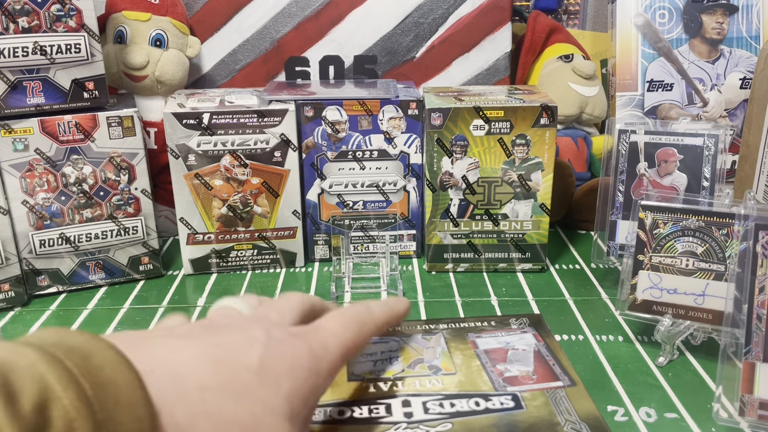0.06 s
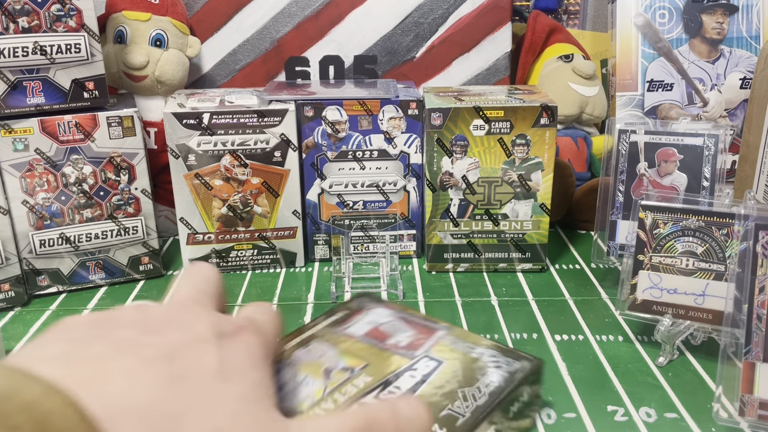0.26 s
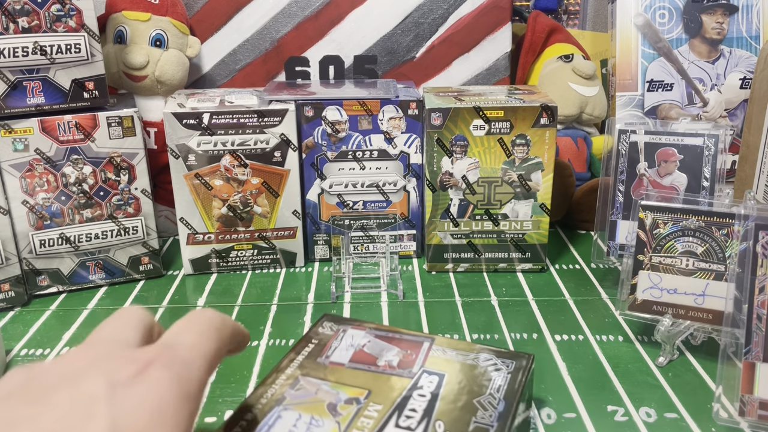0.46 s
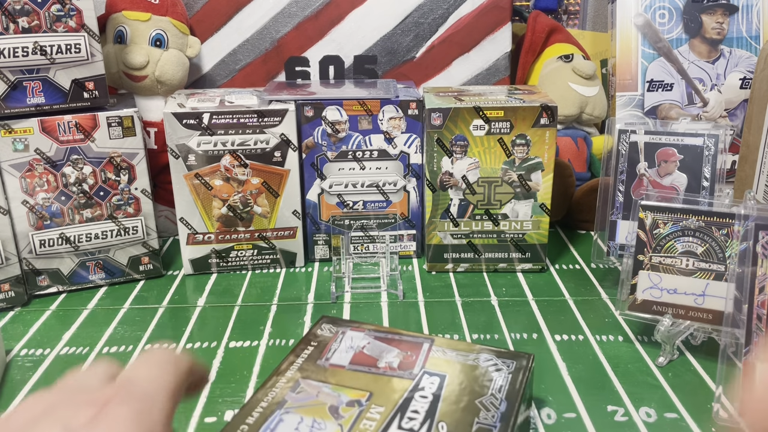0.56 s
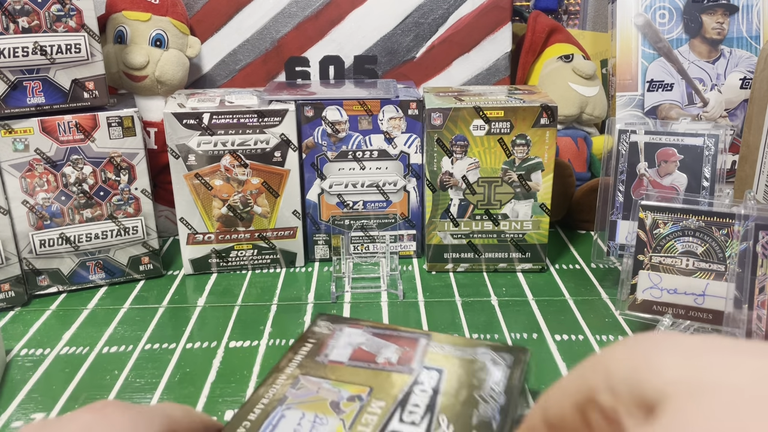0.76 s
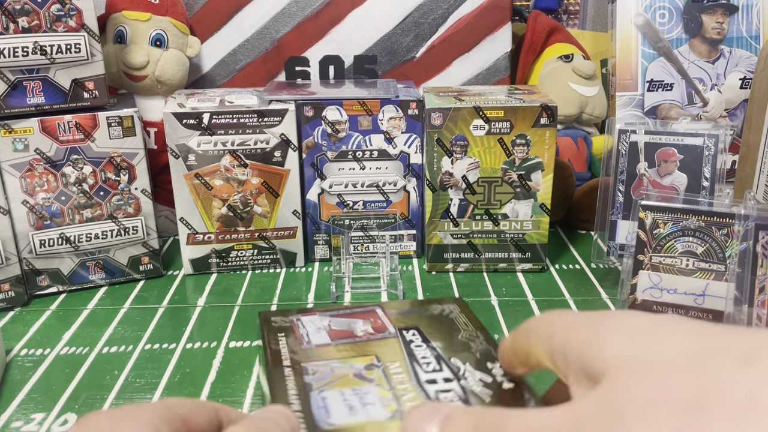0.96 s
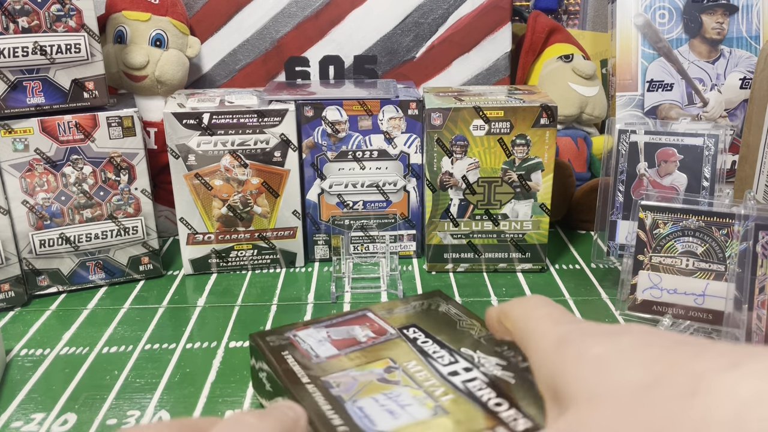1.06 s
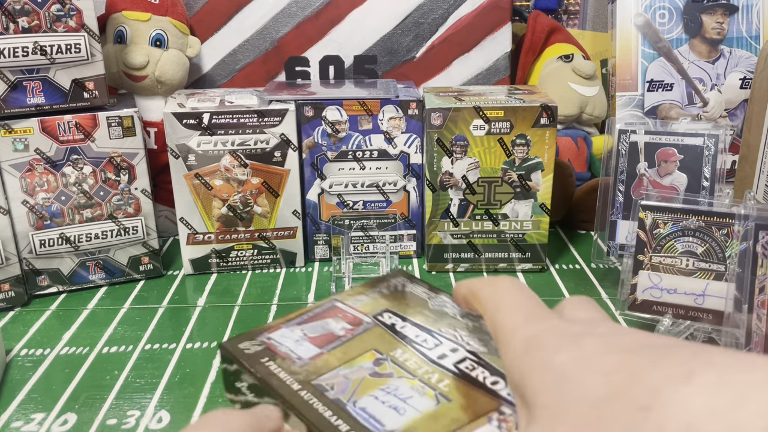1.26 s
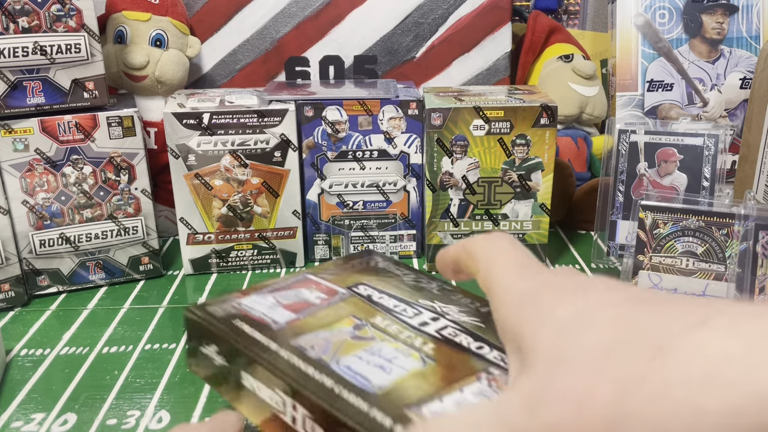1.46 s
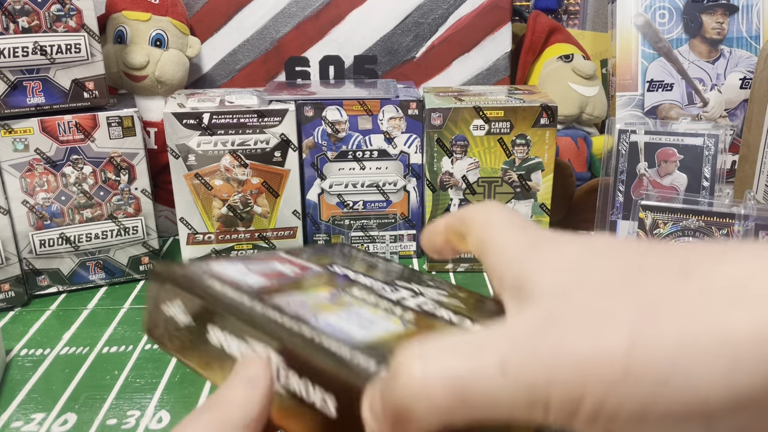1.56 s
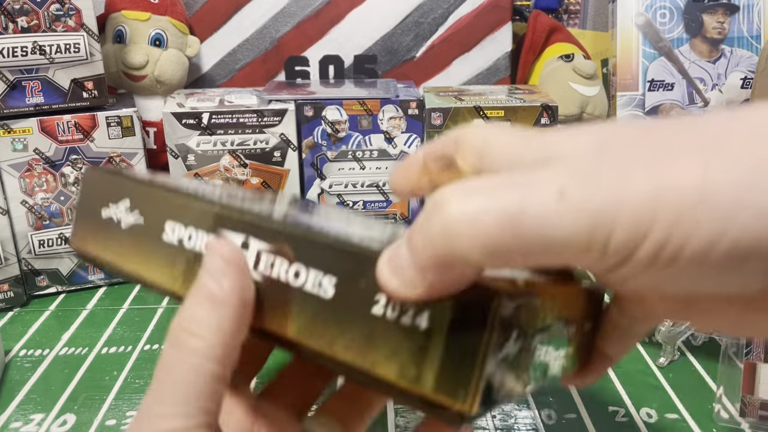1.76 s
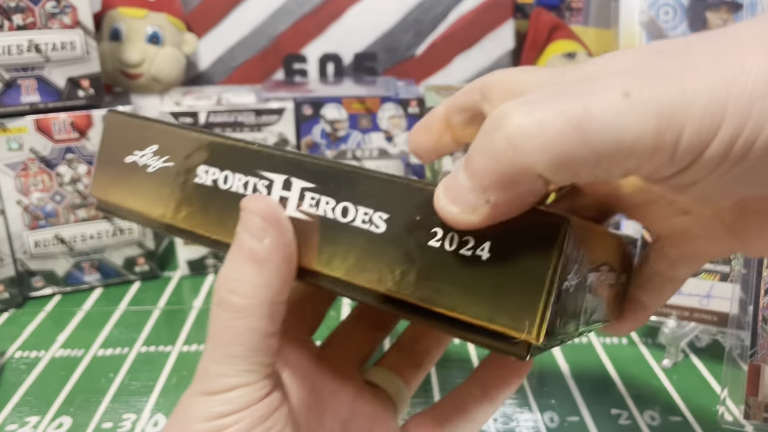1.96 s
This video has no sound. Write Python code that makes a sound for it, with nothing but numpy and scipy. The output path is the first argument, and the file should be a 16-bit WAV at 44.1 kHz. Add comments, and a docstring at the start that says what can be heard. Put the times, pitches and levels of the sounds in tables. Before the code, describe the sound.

Close up in a small, quiet room, a cardboard box is pushed twice over a cloth-covered table, with dry scrapes, light hollow knocks and ticking plastic wrap. After a lull, hands lift it with faint rustling and dull bumps.

```python
"""A film-wrapped cardboard box is pushed across a cloth-covered table, slid again, tipped and lifted.
Tiny slips and a few knocks make the hollow box ring, and the table top drums along.
The wrapping crackles and hisses under the fingers, and the hands bump the box softly.
The microphone is close, in a small, quiet room."""
import sys
import numpy as np
from scipy import signal
from scipy.fft import rfft, irfft, next_fast_len
from scipy.io import wavfile
from scipy.ndimage import map_coordinates

SR = 44100
rng = np.random.default_rng(int(sys.argv[2]) if len(sys.argv) > 2 else 0)


def to_wav(s):
    """Save 16-bit WAV."""
    ch = np.atleast_2d(s).T  # columns
    pcm = np.round(np.clip(ch, -1, 1) * 32767)  # PCM
    wavfile.write(sys.argv[1], SR, pcm.astype(np.int16))


N = 88200  # two seconds


def amp(db):
    """Turn decibels into a gain."""
    return 10 ** (np.asarray(db) / 20)


def unit(x):
    """Scale a sound to an average (rms) level of 1."""
    return x / np.sqrt(np.mean(x ** 2) + 1e-20)


def along(points, hz):
    """Read between (Hz, value) points, giving each octave equal room."""
    freqs, values = np.transpose(points)
    return np.interp(np.log(hz + 1), np.log(freqs + 1), values)


def curve(rows):
    """Join (seconds, value) points with straight lines."""
    return np.interp(np.arange(N) / SR, *np.transpose(rows))


def wobble(rate):
    """A smooth curve through `rate` random values a second."""
    return map_coordinates(rng.standard_normal(int(N * rate / SR) + 4), [np.arange(N) * rate / SR])


def filtered(x, response):
    """Multiply each frequency in a sound by response(hz)."""
    n = x.shape[-1]
    padded = next_fast_len(n + 8192)
    return irfft(rfft(x, padded) * response(np.fft.rfftfreq(padded, 1 / SR)), padded)[..., :n]


def noise(colour, shape):
    """Noise with a colour: a list of how strong each frequency is."""
    return unit(filtered(rng.standard_normal(shape), lambda hz: amp(along(colour, hz))))


def add(track, s, sound):
    """Mix a sound into the track, starting at s seconds."""
    part = track[max(round(s * SR), 0):][:len(sound)]
    part += sound[:len(part)]


def swell(s, db, width):
    """A bell-shaped rise and fall around s seconds."""
    return amp(db) * np.exp(-.5 * ((np.arange(N) / SR - s) / width) ** 2)


def grains(rate, spread_db, colour):
    """Tiny uneven hits, about `rate` a second, each ringing with the given colour."""
    hits = (rng.random(N) < rate / SR) * rng.choice([-1, 1], N)
    strengths = amp(spread_db * np.clip(rng.standard_normal(N), -2, 2))
    # Turn the colour into a ring that starts at once and then dies away.
    size = 4096
    cepstrum = irfft(np.log(amp(along(colour, np.fft.rfftfreq(size, 1 / SR)))))
    ring = irfft(np.exp(rfft(2 * cepstrum * (np.arange(size) < size // 2))))
    return unit(signal.fftconvolve(hits * strengths, ring)[:N])


# How hard the box slides. Each row: time in seconds, level in dB.
SLIDE_FORCE = [(0, -53.5), (.08, -60.5), (.10, -48.5), (.135, -38), (.17, -39.5), (.21, -45), (.26, -36.5),
               (.31, -40), (.355, -44), (.40, -49.5), (.45, -65), (.50, -53.5), (.56, -75), (.69, -61.5),
               (.75, -51.5), (.81, -41), (.89, -44), (.94, -50), (1.04, -53.5), (1.11, -63.5),
               (1.15, -55.5), (1.21, -73), (1.43, -78.5), (1.55, -72), (1.70, -59.5), (1.83, -65),
               (1.89, -68), (1.97, -64), (2, -46.5)]
# The tone of the box and table while sliding. Each row: frequency in Hz, relative level in dB.
SLIP_COLOUR = [(60, -27), (170, -6), (240, -7), (340, 3), (470, 0.5), (590, -12), (720, -10), (920, -10.5),
               (1250, -16), (1700, -21.5), (2500, -26.5), (7000, -40.5), (14000, -55)]
# The tone of a dry scrape. Each row: frequency in Hz, relative level in dB.
SCRAPE_COLOUR = [(100, -13), (400, -12), (1100, 0), (2000, -9), (3500, -7.5), (7000, -23.5), (14000, -39.5)]
def slide():
    """Tiny uneven slips ring the box, scrape on the cloth and set the table top drumming."""
    table_hz, table_fade_s = 131.3, 0.27
    force, t = amp(curve(SLIDE_FORCE)), np.arange(N) / SR
    slips = grains(rate=1300, spread_db=4.5, colour=SLIP_COLOUR) * amp(0.96 * wobble(70))
    scrape = amp(-21.5) * grains(rate=760, spread_db=8, colour=SCRAPE_COLOUR)
    drum = unit(np.sin(2 * np.pi * table_hz * t + 1.3 * wobble(20)) * amp(1.9 * wobble(24.6)))
    fade = amp(-60 * t / table_fade_s)
    lingering_force = signal.fftconvolve(force, fade / fade.sum())[:N]
    return force * (slips + scrape) + amp(-8.5) * drum * lingering_force


# How loud the rubbing is. Each row: time in seconds, relative level in dB.
HISS_LEVEL = [(0, -73.5), (.08, -77), (.13, -65.5), (.27, -61), (.34, -70), (.45, -69.5), (.51, -69.5),
              (.56, -72), (.62, -79.5), (.69, -81), (.76, -69), (1.05, -71), (1.15, -72.5), (1.28, -90.5),
              (1.44, -90.5), (1.49, -87), (1.58, -86.5), (1.65, -68.5), (1.88, -70), (2, -68.5)]
# The tone of the rubbing. Each row: frequency in Hz, relative level in dB.
HISS_COLOUR = [(800, -27.5), (1600, 0), (4600, -6.5), (7000, -5.5), (8200, -3), (9500, -9), (13600, -13),
               (14500, -34)]
def rub():
    """Skin and cloth brush the wrapping with a fine, grainy hiss."""
    hiss = unit(noise(HISS_COLOUR, N) * amp(1.5 * wobble(200)))
    return amp(curve(HISS_LEVEL) + 6.5) * hiss


# The tone of the quiet room. Each row: frequency in Hz, relative level in dB.
RUMBLE_COLOUR = [(20, -17), (38, -0.5), (54, 9), (80, 6.5), (125, -21.5), (180, -6), (350, -22.5),
                 (600, -55), (1500, -36.5), (5000, -51), (14000, -43.5)]
def room_tone():
    """A low rumble, nearly alike on both sides, with a wavering hum in it."""
    hum_hz, t = 54.4, np.arange(N) / SR
    hum = np.sin(2 * np.pi * hum_hz * t + 0.64 * wobble(7)) * amp(1.6 * wobble(8.94))
    rumble = noise(RUMBLE_COLOUR, N) + amp(-9) * noise(RUMBLE_COLOUR, (2, N))
    return amp(-65.5) * rumble + amp(-63) * unit(hum)


# Soft bumps. Each row: peak time in seconds, level in dB, pitch in Hz, rise and fall time in seconds.
HAND_BUMPS = [(0.026, -31, 74, 0.0049), (0.06, -28, 83.5, 0.0045), (0.144, -40.5, 67, 0.016),
              (.245, -32, 103, 0.0079), (0.309, -47, 49.4, 0.022), (0.669, -49, 58.6, 0.0077),
              (0.769, -41, 63, 0.012), (0.807, -43, 45, 0.019), (1.618, -49.5, 52, 0.02),
              (1.78, -43.5, 69, 0.022), (1.799, -31, 111, 0.0046), (1.843, -40, 60, 0.013),
              (1.936, -41.5, 44.6, 0.0083), (1.969, -41, 73.7, 0.0085), (1.997, -26, 99.5, 0.0056)]
def thumps():
    """A hand pushes the box or table through a cycle or two of low shaking."""
    out, t = np.zeros(N), np.arange(N) / SR
    for s, db, hz, width in HAND_BUMPS:
        rounded_peak = np.exp(.5 - np.hypot((t - s) / width, .5))
        out += amp(db) * rounded_peak * np.cos(2 * np.pi * hz * (t - s))
    return out


# The wrapping snaps. Each row: start in seconds, relative level in dB, boost or cut below 8000 Hz in dB.
FILM_SNAPS = [(.089, -39.5, 8), (0.094, -47, -3), (0.0962, -45, -13), (0.116, -30, 2.5), (0.139, -43, -1),
              (0.15, -41, -4), (0.1563, -36, -5), (0.1607, -56, -4), (0.1975, -39.5, -5), (0.2258, -32, 2),
              (0.25, -37.5, 3), (.2870, -21.5, -0.5), (0.2958, -33.5, 8), (0.3708, -34, 10),
              (0.3743, -40, 7), (0.4019, -33.5, 2), (.4125, -56, 4), (0.4623, -38.5, -2), (.476, -38, 1),
              (0.489, -37, 4), (0.501, -33, 5), (0.5071, -31, -4), (.515, -47, -6), (0.522, -45, 10),
              (0.7068, -47.5, 12), (0.7272, -47.5, 9), (0.7433, -40.5, 9), (0.767, -31.5, -4),
              (.795, -40, 14), (.859, -47, 12), (1.482, -57.5, 14), (1.609, -51.5, 12), (1.626, -51, 7)]
# The tone of a snap. Each row: frequency in Hz, relative level in dB.
SNAP_COLOUR = [(1000, -34), (3000, -14), (4200, -18), (5600, -11), (7000, -10.5), (9000, -9.5),
               (10500, -3.5), (12000, -12.5), (14000, -17.5), (16000, -33)]
def snaps():
    """The tight film buckles in bright ticks, each with a faint flutter after it."""
    rise_s, tick_fade_s, flutter_fade_s = 0.00078, 0.0059, 0.039
    out, t = np.zeros(N), np.arange(SR // 20) / SR
    rise = 1 - np.exp(-t / rise_s)
    shape = rise * (amp(-60 * t / tick_fade_s) + amp(-16 - 60 * t / flutter_fade_s))
    for s, db, low_db in FILM_SNAPS:
        colour = [(hz, level + low_db * (hz < 8000)) for hz, level in SNAP_COLOUR]
        add(out, s, amp(db - 8) * shape / shape.max() * noise(colour, len(t)))
    return out


# Changes of hold. Each row: peak time in seconds, level in dB, width of the swell in seconds.
GRIP_SHIFTS = [(0.097, -44, 0.0071), (0.508, -50.5, 0.026), (0.677, -62.5, 0.084), (1.11, -59, 0.049),
               (1.284, -64, .02), (1.508, -65.5, 0.027), (1.62, -61.5, .03), (1.708, -59, 0.017),
               (1.794, -51, 0.0084), (1.836, -56, 0.024), (1.93, -57.5, 0.016)]
# The tone of their rustle. Each row: frequency in Hz, relative level in dB.
RUSTLE_COLOUR = [(60, -13.5), (125, -5), (180, -6.5), (290, -1), (380, -11), (550, -26), (1500, -35.5),
                 (6000, -65)]
def grips():
    """The fingers shift their hold with a dull rustle."""
    loudness = sum(swell(*row) for row in GRIP_SHIFTS)
    return loudness * grains(rate=600, spread_db=3.5, colour=RUSTLE_COLOUR)


# The notes the box rings with on the table, which each knock shifts up or down.
# Each row: base pitch in Hz, relative level in dB, seconds to fade by 60 dB.
BOX_NOTES = [(189.5, -19, 0.12), (292, -14.5, 0.045), (341, -2, 0.075), (429.9, 1.5, 0.058),
             (463.6, -9, 0.044), (527.5, -9.5, 0.049), (613, -16, 0.031), (707, -9, 0.037),
             (886, -9, 0.035), (1047, -8.5, 0.025), (1288, -17, .025), (1546, -21, 0.024)]
def box_ring(tilt_db, pitch, scatter_db):
    """One hit bends the cardboard in waves: the high ones arrive first, the low ones swell after."""
    rise_s, delay_s = 0.0034, .0012  # for a 400 Hz wave
    t, ring = np.arange(SR // 4) / SR, 0
    for hz, db, fade_s in BOX_NOTES:
        ratio = hz / 400
        age = np.maximum(t - delay_s / np.sqrt(ratio), 0)
        level = db + tilt_db * np.log2(max(ratio, 1)) + scatter_db * rng.normal()
        rise = 1 - np.exp(-age * ratio / rise_s)
        ring = ring + amp(level - 60 * age / fade_s) * rise * np.sin(2 * np.pi * hz * pitch * age)
    return ring / np.abs(ring).max()


# The knocks. Each row: start in seconds, level in dB, treble tilt in dB per octave, pitch multiplier.
EDGE_KNOCKS = [(0.1204, -35, 6, 0.89), (0.2273, -24.5, 2, 1.05), (0.3224, -30.5, -4.5, 1.03),
               (0.373, -26.5, 7, 0.98), (.426, -42, 1, 0.33), (.7945, -33, 9.5, 1.1), (.823, -31, 6, 1.16),
               (0.8333, -32.5, 7.5, 1.04), (.883, -35.5, 1, 1.01), (.975, -26, -1, 0.93),
               (0.9953, -20, -5, 1), (1.006, -31.5, 1, 1), (1.129, -47, -4, 1.12),
               (1.4843, -56.5, -2.5, 0.86), (1.7409, -34.5, -6.5, 1.11)]
def knocks():
    """An edge meets the table and rings the box, with a short dry crack."""
    crack_fade_s = 0.034
    out, t = np.zeros(N), np.arange(SR // 4) / SR
    for s, db, tilt_db, pitch in EDGE_KNOCKS:
        crack = amp(-23.5 + tilt_db - 60 * t / crack_fade_s) * noise(SCRAPE_COLOUR, len(t))
        add(out, s, amp(db) * (box_ring(tilt_db, pitch, scatter_db=5) + crack))
    return out


# Short skids. Each row: peak time in seconds, level in dB, width of the swell in seconds, pitch in Hz.
SKID_SWISHES = [(0.833, -43.5, 0.014, 1104), (1.239, -73.5, 0.011, 5720), (1.633, -58.5, 0.0094, 6400),
                (1.822, -61.5, 0.0044, 930), (1.94, -69, .06, 4440)]
def skids():
    """A fingertip or an edge of the box skids, making a swish of noise around one pitch."""
    out = np.zeros(N)
    for s, db, width, centre in SKID_SWISHES:
        swish = filtered(rng.standard_normal(N), lambda hz: 1 / (1 + (12 * (hz / centre - 1)) ** 2))
        out += swell(s, db, width) * unit(swish)
    return out


# The room's short echo. Each row: frequency in Hz, seconds to fade by 60 dB.
ECHO_FADE = [(150, 0.26), (1000, 0.11), (10000, 0.15)]
def placed(x, pan, phase, echo_db):
    """Add the room's echo to a sound; pan (dB) makes the left side louder, phase (radians) earlier."""
    side = np.array([[1], [-1]])
    direct = filtered(x, lambda hz: amp(side * pan(hz)) * np.exp(.5j * side * phase(hz)))
    hz, t, bands = signal.stft(rng.standard_normal((2, SR // 3)), SR, nperseg=256)
    fading_bands = bands * amp(-60 * t / along(ECHO_FADE, hz)[:, None])
    echo = signal.istft(fading_bands, SR, nperseg=256)[1]
    echo = np.pad(echo / np.linalg.norm(echo[0]), ((0, 0), (SR // 250, 0)))  # arrives 4 ms late
    return direct + amp(echo_db) * signal.fftconvolve(x[None], echo, axes=1)[:, :N]


# Where the wrapping is heard. Each row: frequency in Hz, dB added on the left and taken off the right.
FILM_LEAN = [(1000, -0.5), (5500, 3.2), (8000, -0.5), (13000, 0)]
# Which side hears the wrapping first. Each row: frequency in Hz, the left side's head start in radians.
FILM_LEAD = [(500, 2), (2500, 1.66), (5000, 0.82), (6700, -1.5), (7900, -2.5), (11000, -6), (12300, -6.5),
             (14000, -9)]
def scene():
    """Box, wrapping, hands and room together, with the box a little to the left."""
    left_lead_s = .00003
    box = knocks() + slide() + grips() + skids()
    box = placed(box, pan=lambda hz: 1.54, phase=lambda hz: 2 * np.pi * hz * left_lead_s, echo_db=-10.5)
    film = snaps() + rub()
    film = placed(film, lambda hz: along(FILM_LEAN, hz), lambda hz: along(FILM_LEAD, hz), echo_db=-14)
    hands = placed(thumps(), pan=lambda hz: 0, phase=lambda hz: .2, echo_db=-13)
    return box + film + hands + room_tone()


# The tone of the microphone. Each row: frequency in Hz, boost or cut in dB.
MIC_COLOUR = [(20, -0.5), (7000, -2.5), (7600, -6.5), (8150, -18), (8800, 3), (9500, 0.5), (13500, 2),
              (14600, -3), (16000, -23)]
def record(dry):
    """The microphone has a narrow dip in its treble and loses the very highest sounds."""
    top_hz = 15600
    return filtered(dry, lambda hz: amp(along(MIC_COLOUR, hz)) * (hz < top_hz))


dry = scene()
out = record(dry)
to_wav(out)
```